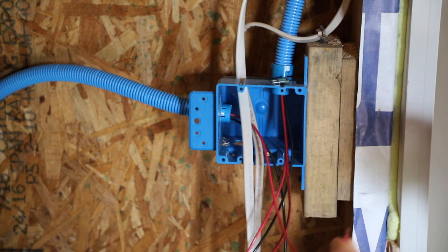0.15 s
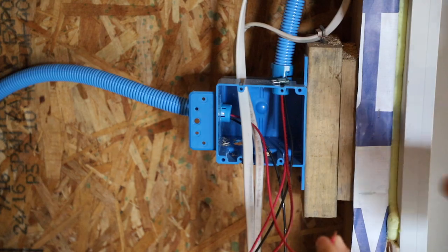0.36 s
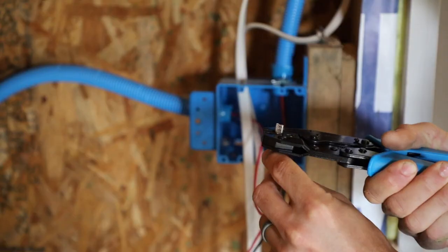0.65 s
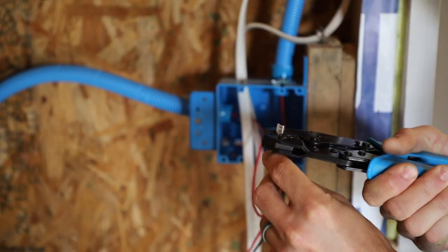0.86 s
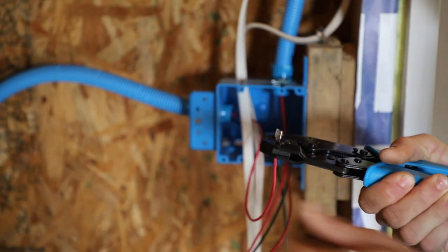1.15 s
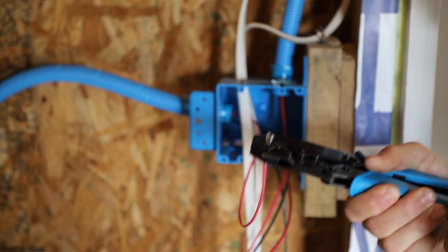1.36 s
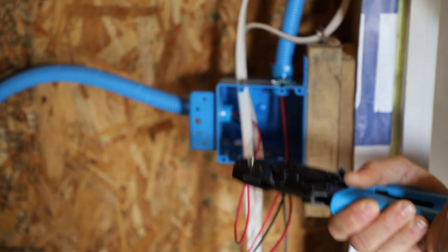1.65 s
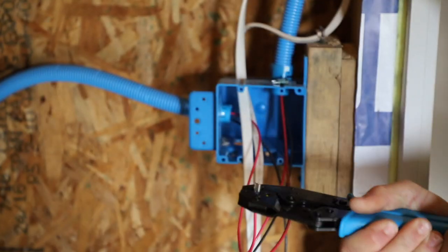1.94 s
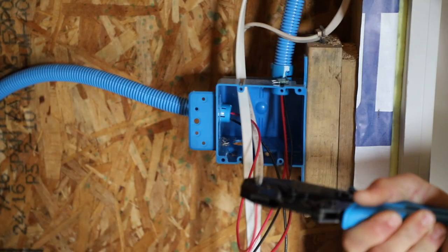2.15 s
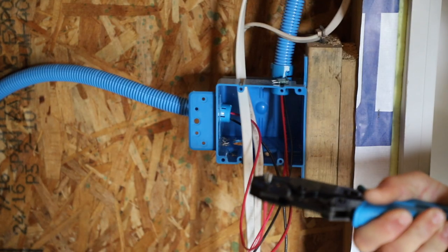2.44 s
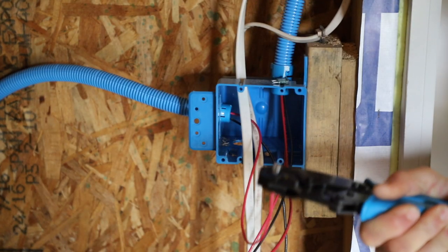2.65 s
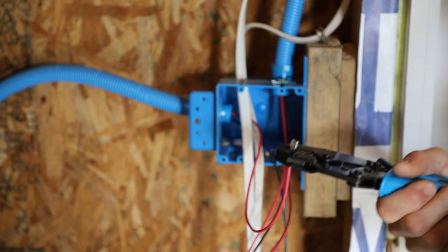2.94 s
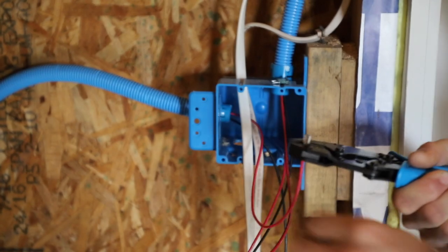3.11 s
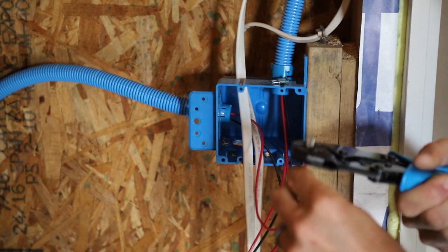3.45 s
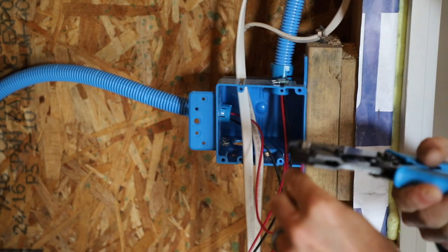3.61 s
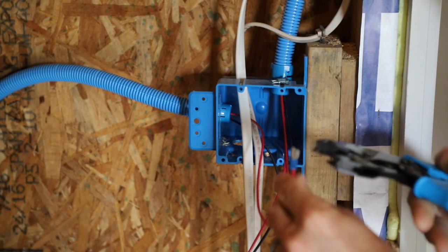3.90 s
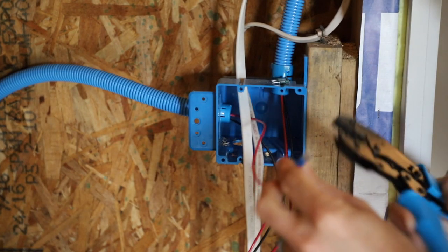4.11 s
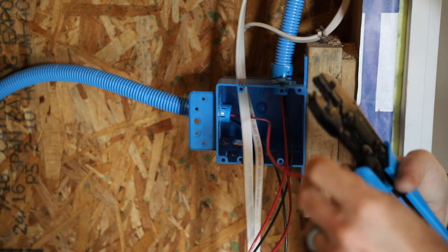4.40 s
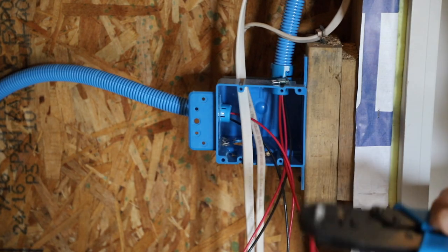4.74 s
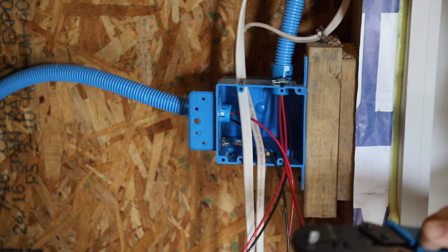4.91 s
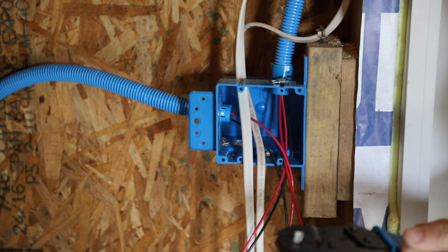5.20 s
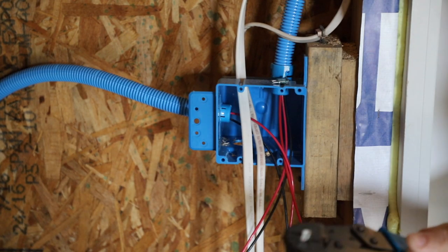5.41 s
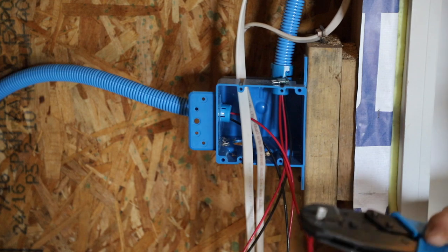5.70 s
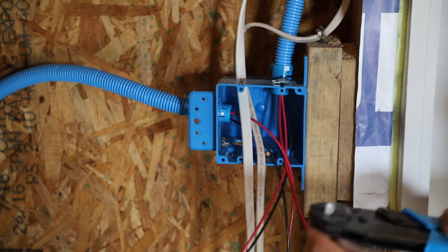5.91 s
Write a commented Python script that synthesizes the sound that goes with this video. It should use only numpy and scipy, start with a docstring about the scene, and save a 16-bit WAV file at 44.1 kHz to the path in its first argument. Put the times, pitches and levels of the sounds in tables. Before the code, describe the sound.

Loud metallic ratchet clicks, a quick clattering release and another run of clicks, with wire taps, soft rustle and dull floor knocks.

```python
"""In a bare wood-lined room a ratchet crimping tool is squeezed near a microphone.
Its pawl clicks and rattling release are steel modes excited by short bursts of contact; thin tones and clinks ring on.
Wires tap a hollow plastic box and floor boards knock (struck modes); the floor booms (narrow-band noise) as weight
shifts, and hands rustle (dense scrapes) over a quiet hiss. Sparse random echoes make the room.
The loud clicks overload the recorder: its gain control dips for a moment and the peaks clip."""
import sys
import numpy as np
from scipy import signal
from scipy.fft import rfft, irfft
from scipy.io import wavfile
from scipy.ndimage import uniform_filter1d

SR = 44100
rng = np.random.default_rng(int(sys.argv[2]) if len(sys.argv) > 2 else 0)


def bounce(signal):
    """Save signal as a 16-bit WAV file at the path given by the first command-line argument."""
    frames = np.transpose(np.atleast_2d(signal))
    limited = np.clip(frames, -1, 1)
    pcm = np.round(limited * 32767).astype(np.int16)
    wavfile.write(sys.argv[1], SR, pcm)


N = 267290  # length in samples

# hiss spectrum: (frequency [Hz], relative level [dB])
HISS_SPECTRUM = [(12, -51), (20, -9.5), (107, -2.5), (277, -9), (446, -13), (607, -15.5), (660, -15.5),
                 (1030, -20), (1120, -20), (1220, -21), (2260, -24), (2600, -24), (16000, -33)]
HISS_DB = -51.5  # rms level

# hands and wires rustling: (time of top [s], level [dB], swell [s], fade [s])
RUSTLES = [(0.032, -41.5, 0.005, .03), (0.05, -38, .008, 0.032), (0.113, -28.5, 0.0033, 0.0078),
           (0.125, -43.5, 0.0071, .1), (0.61, -56.5, .035, 0.087), (0.672, -50.5, 0.031, 0.0097),
           (1.544, -56.5, 0.55, 0.32), (2.892, -60, 0.08, .07), (2.934, -61.5, .01, .022),
           (3.048, -53.5, 0.061, .07), (3.382, -51, 0.036, .01), (4.284, -56.5, .14, 0.056),
           (4.388, -58, 0.22, .022), (4.479, -44.5, .065, 0.025), (4.69, -59.5, 0.09, .02),
           (4.8, -56.5, .13, 0.009), (5.5, -58.5, 0.011, .12), (5.672, -53.5, 0.14, 0.028),
           (5.794, -71, 0.095, .015)]
# rustle spectrum: (frequency [Hz], relative level [dB])
RUSTLE_SPECTRUM = [(1000, -8.5), (2500, -5.5), (4500, -2), (6500, -4.5), (9000, -13.5), (14000, -17.5)]
SWELL_DB = 20  # how far under its top a swell starts and a fade ends

# floor booming under shifting weight: (time of top [s], level [dB], resonance [Hz], swell [s], fade [s])
BOOMS = [(0.075, -36, 76, 0.056, 0.24), (0.42, -54, 95, 0.055, .06), (2.011, -40.5, 96, 0.063, 0.16),
         (2.123, -37.5, 84.2, 0.24, 0.19), (2.86, -44, 110, 0.087, 0.41), (3.13, -50, 101, 0.19, .1),
         (3.251, -33.5, 86.8, 0.13, 0.21), (3.45, -47.5, 107.6, .08, .06), (5.691, -53.5, 97.6, .12, .3),
         (5.85, -54, 99.2, 0.15, 0.051)]
# floor boards knocking: (time [s], level [dB], gain of modes above 600 Hz [dB])
BOARD_KNOCKS = [(0.038, -32, 5), (0.054, -25.5, -7), (0.074, -27, -16), (0.109, -35, -6), (0.139, -31, -2),
                (0.171, -40, -7), (2.03, -52, -4), (2.08, -37, 13), (2.158, -35, 7.5), (2.24, -43, -3),
                (2.787, -41.5, -7.5), (2.839, -40.5, 12.5), (2.974, -36, 2.5), (3.07, -41.5, -3),
                (3.173, -27, 2), (3.208, -30.5, 2.5), (3.291, -32.5, 8), (3.388, -39.5, -10)]
# modes of the boards: (frequency [Hz], level [dB], t60 [s])
BOARD_MODES = [(121, -13, 0.09), (216, -7.5, 0.078), (266.7, -7, 0.068), (398, -9.5, 0.032),
               (523, -10, 0.046), (662, -10.5, 0.051), (756, -12.5, 0.1)]

# wires tapping the plastic box: (time [s], level [dB], gain of modes above 1200 Hz [dB])
BOX_TAPS = [(0.037, -23, 3), (0.051, -26, -5), (0.111, -16.5, 2), (0.133, -23.5, 6), (0.159, -35, 2),
            (0.318, -41.5, -26.5), (0.371, -31, 10), (0.599, -42, -21), (3.87, -29, 8),
            (3.999, -39.5, -11.5), (4.803, -35, -2)]
# modes of the hollow box: (frequency [Hz], level [dB], t60 [s])
BOX_MODES = [(292.5, -6.5, 0.044), (866, 4.5, 0.038), (1920, -9, 0.021), (2888, -8.5, 0.017),
             (3770, -22, .02), (5212, -14, 0.013)]

# pawl dropping over a tooth: (time [s], relative level [dB], low jaw mode [Hz], high jaw mode [Hz],
# handle modes [dB], treble modes [dB], body modes [dB], body tilt [dB])
PAWL_DROPS = [(0.7949, 4, 3217, 3560, -1.5, -2, -3, -1), (1.042, 4.5, 3176, 3710, -4.5, 2, 2, -1.5),
              (1.7974, 2.5, 3000, 3700, 0, 9.5, 13, 3.5), (1.8497, 3.5, 2970, 3530, -1, 5.5, 6.5, -0.5),
              (1.9025, 8.5, 2720, 3260, 1, 2.5, 7, 1), (4.8313, 4.5, 3067, 3520, -3.5, 1.5, -5.5, -0.5),
              (4.8971, 3.5, 3037, 3460, -4, 1, 3, -2), (4.9576, 1, 3020, 3750, 7, 8.5, 6.5, 0),
              (5.024, 4, 2360, 3780, 3, 7.5, 7, -3.5), (5.0922, 6.5, 2436, 3770, 0, -0.5, 8.5, -1)]
# loose parts of the tool rattling: (time [s], relative level [dB], jaw opening [0 shut to 1 open])
RATTLES = [(2.1691, -44, 0), (2.2405, -44, 0), (2.9348, -40.5, 0.46), (3.318, -48.5, 0), (3.361, -46.5, 0),
           (3.6276, -26, 0.7), (3.678, -31.5, 0.9), (3.6838, -15.5, 1), (3.690, -10.5, 0.84),
           (3.6957, -12.5, 1), (3.7025, -12.5, 1), (3.7177, -13.5, 0.9), (3.739, -14, 1),
           (3.752, -11, 0.86), (3.7658, -4.5, 0.94), (3.7801, -16.5, 0.92), (3.7922, -22.5, 1),
           (3.8125, -22.5, 1), (3.8642, -19, 0.93), (5.5002, -49, .8), (5.662, -39, .8), (5.9498, -39, 0.8),
           (6.0192, -24.5, 0.92)]
# short steel modes, damped in proportion to width: (frequency [Hz], relative width [Hz], level [dB])
STEEL_MODES = [(736, 390, -31), (1493, 480, -18.5), (2011, 280, -24), (4528, 370, 2.5), (5530, 280, 2.13),
               (5615, 150, -1.5), (6566, 650, 1), (7753, 450, 0), (8970, 600, -0.5), (9500, 180, -6),
               (10160, 420, -8), (11430, 280, -12), (12860, 300, -14.5), (15210, 1100, -14),
               (15000, 1200, -16.5)]
JAW_SHUT_HZ, JAW_OPEN_HZ = 2450, 3165  # low jaw mode in a rattle
RATTLE_HIGH_HZ = 3670  # high jaw mode in a rattle
BODY_SHUT_DB, BODY_OPEN_DB = 21.5, 7.5  # mean body level; these modes sound most with the jaws shut
RATTLE_HANDLE_DB, RATTLE_TREBLE_DB = 3.5, 3  # mean levels with the jaws open
SHUT_DULL_DB = 7.5  # treble lost with the jaws shut
RATTLE_TILT_DB, RATTLE_SCATTER_DB = 1.5, 2.5  # mean body tilt; standard deviation of each level

# steel left ringing: (time [s], lowest mode [dB], second mode [dB], upper modes [dB], delay to grip damping [s])
FREE_RINGS = [(0.794, -40, -47.5, -53.5, 0.034), (1.043, -61.5, -42.5, -59, 0.31),
              (1.795, -53, -65.5, -65.5, 0.29), (1.903, -55, -66, -43.5, 1.0),
              (4.831, -50.5, -65, -52.5, 0.31), (5.092, -51.5, -49.5, -45.5, .45)]
# long steel modes: (frequency [Hz], level [dB], t60 [s])
LONG_MODES = [(1152, 0, 5.0), (3615, -2, 1.2), (2385, -6, .5), (4320, 0.1, 1.1), (4990, -8, .5),
              (10620, -8, .7), (12490, -10, .6)]

# open handles clinking lightly: (time [s], level [dB], tilt [dB per octave])
HANDLE_CLINKS = [(3.6267, -22, 0), (5.9584, -31, -9.5), (6.0188, -20, -5)]
# modes of the clinking metal: (frequency [Hz], level [dB], t60 [s])
CLINK_MODES = [(1870, -22, 0.056), (2930, -4.5, 0.043), (3350, -8.5, 0.094), (4090, -2, 0.073),
               (4570, -21, .1), (5150, -8.5, 0.12), (5750, -6, 0.055), (6700, -13, 0.3), (7800, -18, 0.077),
               (10140, -17, 0.017), (11500, -7, 0.042)]

# decay of the room: (frequency [Hz], t60 [s])
ROOM_T60 = [(300, 0.51), (1300, 0.44), (3500, 0.39), (9000, 0.36), (15000, 0.23)]
# what the walls send back: (frequency [Hz], relative level [dB])
WALL_SPECTRUM = [(500, -12.5), (2000, 2.5), (4000, 4.5), (10000, 3.5), (15000, 1)]
EDGE_HZ = 16050  # upper band limit of the recorder


def gain_of(db):
    """Decibel law: amplitude gain is ten to the level over twenty."""
    return 10 ** (np.asarray(db) / 20)


def evened(x):
    """Power normalisation: scales a signal to rms 1."""
    return x / np.sqrt(np.mean(x ** 2) + 1e-20)


def read(points, hz):
    """Interpolation of a spectrum table on a log-frequency axis."""
    f, value = np.transpose(points)
    return np.interp(np.log(hz + 1), np.log(f + 1), value)


def add(mix, s, sound):
    """Superposition: adds a sound to the mix from time s."""
    part = mix[round(s * SR):][:len(sound)]
    part += sound[:len(part)]


def coloured(x, points):
    """Linear filtering: multiplies the spectrum by a table of levels."""
    gain = gain_of(read(points, np.fft.rfftfreq(len(x), 1 / SR)))
    return irfft(rfft(x) * gain, len(x))


def swell(t, top_s, db, swell_s, fade_s):
    """Exponential envelope: the level climbs steadily in dB to its top and sinks again."""
    before = (top_s - t) / max(swell_s, .003)
    after = (t - top_s) / max(fade_s, .003)
    return gain_of(db - SWELL_DB * np.where(t < top_s, before, after))


def ringing(modes, length_s):
    """Modal superposition: decaying sines after one sharp blow, neighbours in opposite sign."""
    t = np.arange(round(length_s * SR)) / SR
    return sum((-1) ** k * gain_of(db - 60 * t / t60) * np.sin(2 * np.pi * hz * t)
               for k, (hz, db, t60) in enumerate(modes))


def chattered(ring, chatter_s, rise):
    """Extended excitation: a burst of contact noise drives the modes, with the energy of a clean blow of peak 1."""
    u = np.arange(600) / SR / chatter_s
    contact = rng.standard_normal(600) * np.exp(-u) * (1 - np.exp(-u / rise))
    out = signal.oaconvolve(ring, contact)[:len(ring)]
    return out / np.linalg.norm(out) * np.linalg.norm(ring) / abs(ring).max()


def struck(modes, chatter_s, length_s):
    """Soft impact: modes driven by a contact that builds up more slowly than a steel blow."""
    return chattered(ringing(modes, length_s), chatter_s, rise=0.58)


def quiet_hiss():
    """Stationary noise: white noise shaped by a fixed spectrum."""
    return gain_of(HISS_DB) * evened(coloured(rng.standard_normal(N), HISS_SPECTRUM))


def floor_boom(t, hz):
    """Resonant noise: white noise, shifted down by hz, passes two low-pass poles and is shifted back."""
    turn = np.exp(2j * np.pi * hz * t)
    r = np.exp(-np.pi * 45. / SR)  # each pole is 45 Hz wide
    once = signal.lfilter([1], [1, -r], rng.standard_normal(len(t)) / turn)
    sway = signal.lfilter([1], [1, -r], once)
    return (turn * sway).real


def scuffing(length):
    """Stick-slip friction: sparse random slips, 300 a second on average, excite the board modes."""
    slips = (rng.random(length) < 300. / SR) * rng.standard_normal(length)
    return signal.oaconvolve(slips, ringing(BOARD_MODES, .1))[:length]


def floor_boards():
    """Modal impact and resonance: dull board knocks, and swells of low boom mixed with scuffing."""
    out = np.zeros(N)
    for s, db, upper_db in BOARD_KNOCKS:
        modes = [(hz, d + upper_db * (hz > 600), t60) for hz, d, t60 in BOARD_MODES]
        add(out, s, gain_of(db) * struck(modes, 0.0048, .15))
    for top_s, db, hz, swell_s, fade_s in BOOMS:
        t = max(top_s - .4, 0) + np.arange(SR) / SR
        both = evened(floor_boom(t, hz)) + gain_of(-11.5) * evened(scuffing(len(t)))
        add(out, t[0], swell(t, top_s, db, swell_s, fade_s) * both)
    return out


def rustle():
    """Granular friction: dense tiny scrapes of uneven size under the moving hands."""
    size = gain_of(1.9 * np.minimum(rng.exponential(1, N), 5))
    scrapes = size * (rng.random(N) < 4000. / SR) * rng.standard_normal(N)  # about 4000 a second
    t = np.arange(N) / SR
    return sum(swell(t, *row) for row in RUSTLES) * evened(coloured(scrapes, RUSTLE_SPECTRUM))


def box_taps():
    """Modal impact on a hollow body: low knocking modes with a bright edge of upper ones."""
    out = np.zeros(N)
    for s, db, bright_db in BOX_TAPS:
        modes = [(hz, d + bright_db * (hz > 1200), t60) for hz, d, t60 in BOX_MODES]
        add(out, s, gain_of(db) * struck(modes, 0.0024, .12))
    return out


def steel(db, low_hz, high_hz, handle_db, treble_db, body_db, tilt_db, chatter_s):
    """Impact of steel on steel: a chattered blow for the straight path and its clean ring for the walls."""
    upper = [(low_hz, 0, 2.3 / 300), (high_hz, -1.5, 2.5 / 350)]  # the jaw pair moves as the jaws close
    lower = []
    for hz, width, d in STEEL_MODES:
        if hz > 4000:
            upper.append((hz, d + (handle_db if hz < 6300 else treble_db), 1.335 / width))
        else:
            # tilt raises the top body mode and lowers the middle one
            tilt = tilt_db * np.sign(hz - 1750) * (hz > 1000)
            lower.append((hz, d + body_db + tilt, 2.98 / width))
    # small parts radiate little below their first mode
    edge = signal.butter(4, 0.91 * low_hz, "high", fs=SR, output="sos")
    ring = signal.sosfilt(edge, ringing(upper, .03)) + ringing(lower, .03)
    size = gain_of(db + 6.5)  # a spread burst holds more energy than one clean blow of the same peak
    return size * chattered(ring, chatter_s, rise=0.012), size * ring / abs(ring).max()


def pawl_clicks():
    """Ratchet impact: one steel blow for each drop of the pawl over a tooth."""
    return [(s, steel(*rest, chatter_s=0.0031)) for s, *rest in PAWL_DROPS]


def rattling():
    """Repeated impact: each blow of the loose parts is followed by two fainter bounces of the same colour."""
    blows = []
    for s, db, opening in RATTLES:
        jaws = JAW_SHUT_HZ + (JAW_OPEN_HZ - JAW_SHUT_HZ) * opening, RATTLE_HIGH_HZ
        body_db = BODY_SHUT_DB + (BODY_OPEN_DB - BODY_SHUT_DB) * opening
        treble_db = RATTLE_TREBLE_DB - SHUT_DULL_DB * (1 - opening)
        colour = np.array([RATTLE_HANDLE_DB, treble_db, body_db, RATTLE_TILT_DB])
        colour = colour + RATTLE_SCATTER_DB * rng.standard_normal(4)
        blows.append((s, steel(db, *jaws, *colour, chatter_s=0.0043)))
        for u in rng.random(2):
            blows.append((s + .004 + .016 * u, steel(db - 16, *jaws, *colour, chatter_s=.001)))
    return blows


def tool():
    """Superposition of all steel blows: row 0 is the straight sound, row 1 goes to the walls."""
    out = np.zeros((2, N))
    for s, (straight, around) in pawl_clicks() + rattling():
        add(out[0], s, straight)
        add(out[1], s, around)
    return out


def free_ring():
    """Free vibration: faint thin tones of the steel decay slowly until the grip damps them."""
    out, t = np.zeros(N), np.arange(SR + SR // 2) / SR
    for s, low_db, second_db, upper_db, held_s in FREE_RINGS:
        parts = zip((low_db, second_db, upper_db), (LONG_MODES[:1], LONG_MODES[1:2], LONG_MODES[2:]))
        tones = sum(gain_of(db) * ringing(modes, 1.5) for db, modes in parts)
        grip = gain_of(-400 * np.maximum(t - held_s, 0))  # the grip takes 400 dB a second
        add(out, s, grip * tones)
    return out


def clinks():
    """Light modal impact: a brief contact lets the separate metal partials ring clear."""
    out = np.zeros(N)
    for s, db, tilt_db in HANDLE_CLINKS:
        modes = [(hz, d + tilt_db * np.log2(hz / 4000), t60) for hz, d, t60 in CLINK_MODES]
        add(out, s, gain_of(db) * struck(modes, 0.0005, .2))
    return out


def room(x, gap_s):
    """Reverberation: sparse echoes of random sign build up over gap_s, each band dying at its own speed."""
    taps = np.zeros(SR)
    at = np.arange(0, SR - 20, 20)
    taps[at + rng.integers(0, 20, len(at))] = rng.choice([-1., 1.], len(at))
    hz, t, z = signal.stft(taps, SR, nperseg=256)
    level_db = read(WALL_SPECTRUM, hz)[:, None] - 60 * t / read(ROOM_T60, hz)[:, None]
    tail = signal.istft(z * gain_of(level_db), SR, nperseg=256)[1]
    t = np.arange(len(tail)) / SR
    clumps = evened(uniform_filter1d(rng.standard_normal(len(tail)), size=130))
    tail *= gain_of(2.0 * clumps * np.exp(-t / 0.033))  # early echoes arrive in bunches
    tail *= np.clip(t / gap_s, 0, 1) ** 2
    return signal.fftconvolve(x, tail / np.linalg.norm(tail))[:N]


def scene():
    """Superposition of all sources, the near ones with the room's answer."""
    hiss = quiet_hiss()
    floor = floor_boards()
    hands = rustle() + box_taps() + clinks()
    straight, around = tool()
    echo = gain_of(-11.5) * room(around + hands, gap_s=0.0085)
    return (straight + hands + echo + free_ring() + floor + hiss)[None]


def record(dry):
    """Compression and overload: gain dips within a few ms of a click and recovers; peaks clip; the band is limited."""
    power = uniform_filter1d(dry[0] ** 2, 44, origin=21)  # mean over the last millisecond
    power_db = 10 * np.log10(abs(power) + 1e-12)
    fall = np.arange(N) * 150. / SR  # the held power reading falls 150 dB a second
    held_db = np.maximum.accumulate(power_db + fall) - fall
    over_db = np.maximum(held_db + 10.0, 0)  # excess over a threshold of -10 dB
    late_db = signal.lfilter([.012], [1, -.988], over_db)  # the dip lags by about 2 ms
    clipped = np.clip(dry / gain_of(0.52 * late_db), -1, 1)  # 0.52 dB of dip for each dB of excess
    band = signal.firwin(511, EDGE_HZ, window=("kaiser", 9), fs=SR)
    return signal.oaconvolve(clipped, band[None], "same")


dry = scene()
out = record(dry)
bounce(out)
```